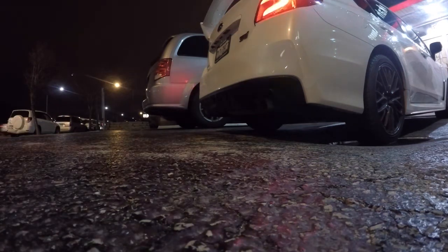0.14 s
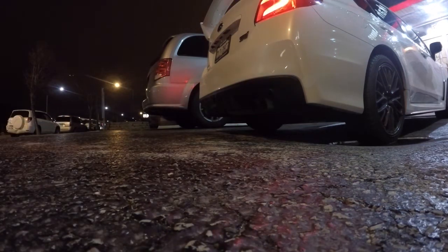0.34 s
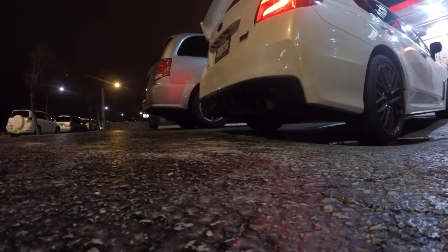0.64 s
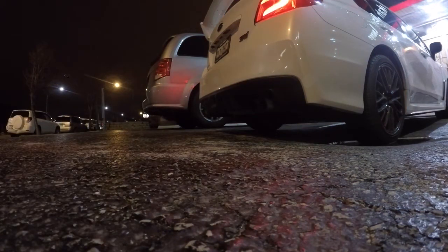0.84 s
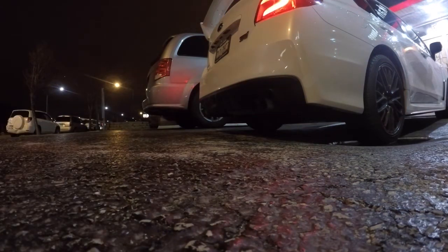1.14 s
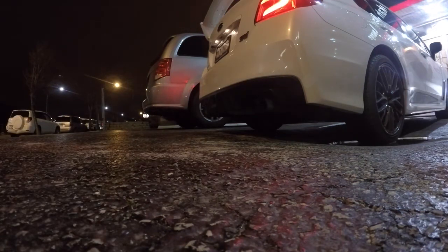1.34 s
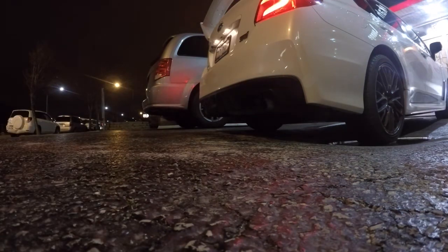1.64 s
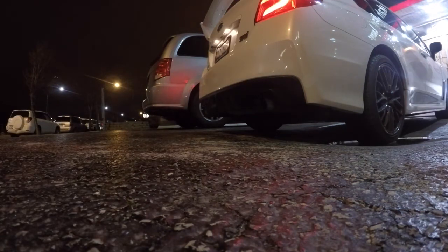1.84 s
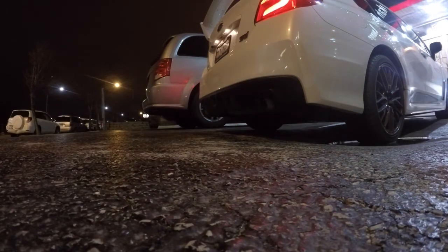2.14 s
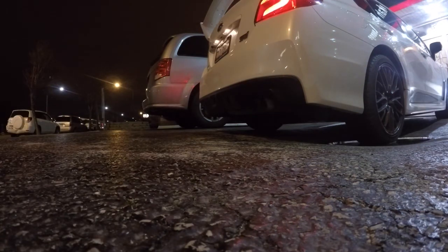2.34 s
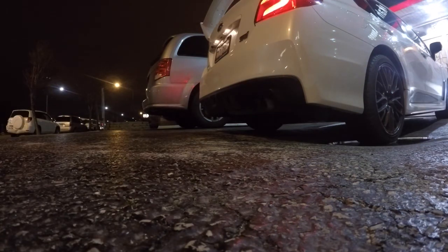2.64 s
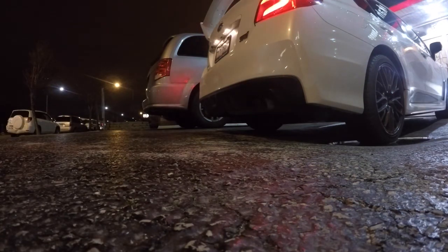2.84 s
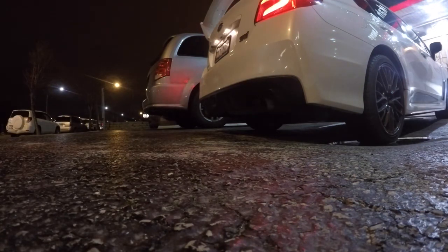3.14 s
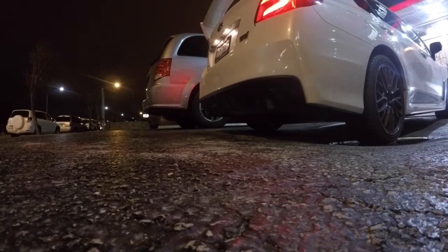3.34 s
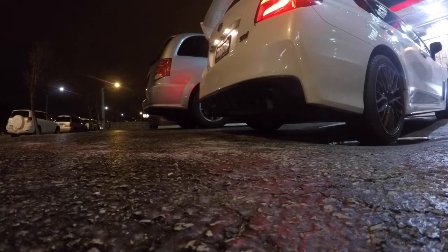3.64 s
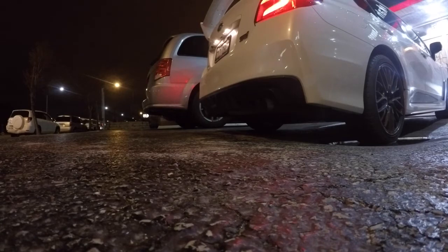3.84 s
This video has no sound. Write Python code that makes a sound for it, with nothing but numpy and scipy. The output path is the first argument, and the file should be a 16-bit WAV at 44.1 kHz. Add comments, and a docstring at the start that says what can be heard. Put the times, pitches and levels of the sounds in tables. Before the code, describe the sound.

A car engine starts in a night car park: quiet distant traffic first, then a starter clunk and grinding crank, clipped bangs as it catches, and a fast, low exhaust idle close to a microphone on the ground.

```python
"""Night car park: a cased action camera lies on the asphalt behind a car.
Shaped noise gives far traffic, broad hiss, rumble and a rustle; a thin electronic tick is a train of struck resonances.
The starter engages and cranks as noise ringing in its housing, with dull puffs from the pipe.
The four-cylinder engine catches with a few bangs and climbs to a fast cold idle: pulses excite exhaust modes.
The recorder turns its gain down, clips the first bangs and drops one block of samples."""
import sys
import numpy as np
from scipy import signal
from scipy.io import wavfile
from scipy.ndimage import uniform_filter1d

SR = 44100
rng = np.random.default_rng(int(sys.argv[2]) if len(sys.argv) > 2 else 0)


def store_pcm(level_fs):
    """Save levels as 16-bit WAV."""
    pcm = np.round(np.clip(level_fs, -1, 1) * 32767).astype(np.int16)
    wavfile.write(sys.argv[1], SR, np.atleast_2d(pcm).T)


def attenuation_scalar(level_db):
    """Turn a level in dB into a linear amplitude multiplier (20 dB per decade)."""
    decades = np.asarray(level_db, float) / 20
    return 10 ** decades


N = 176400
LONG = N + 2048   # spare samples to fill the dropped block
TIME = np.arange(LONG) / SR
SKIP_AT_S, SKIP_S = 3.4233, 0.0242   # start and length of the dropped block
RUNS_FROM_S = 3.085   # regular firing begins
CRACK_LAG_S = 0.0035   # the steepened front of a pulse peaks later than its start


def curve(rows, column=1):
    """Linear interpolation: a table column joined by straight lines in time."""
    return np.interp(TIME, np.array(rows)[:, 0], np.array(rows)[:, column])


def drift(rate_hz):
    """Low-passed random process: slow chance of unit spread, computed every 40 samples."""
    r = np.exp(-80 * np.pi * rate_hz / SR)
    white = rng.standard_normal(LONG // 40 + 2002)
    slow = signal.lfilter([1], [1, -2 * r, r * r], white)[2000:]
    return np.interp(np.arange(LONG) / 40, np.arange(len(slow)), slow / slow.std())


def noise(tone, patchy_db):
    """Band synthesis: bands of at most 0.4 octave, each with its level and flicker, sum to noise of rms 1."""
    hz, db = np.transpose(tone)
    edges = np.geomspace(hz[0], hz[-1], int(2.5 * np.log2(hz[-1] / hz[0])) + 2)
    out, white = 0, rng.standard_normal((2, LONG))
    for k, (low, high) in enumerate(zip(edges, edges[1:])):
        band_pass = signal.butter(2, [low, high], "band", fs=SR, output="sos")
        band = signal.sosfilt(band_pass, white[k % 2])
        band_db = np.interp(np.log(low * high) / 2, np.log(hz), db)
        out = out + band * attenuation_scalar(band_db + patchy_db * drift(9))
    return out / out.std()


def ring(x, hz, t60):
    """Damped resonance: a unit click starts a decaying sine of initial height 1."""
    r, w = attenuation_scalar(-60 / (t60 * SR)), 2 * np.pi * hz / SR
    return signal.lfilter([0, np.sin(w)], [1, -2 * r * np.cos(w), r * r], x + 1e-18)


def clicks(s, db):
    """Impulse excitation: single-sample clicks at the given times."""
    out = np.zeros(LONG)
    np.add.at(out, (np.asarray(s) * SR).astype(int), attenuation_scalar(np.asarray(db)))
    return out


def soften(x, hz):
    """Double one-pole low-pass: a click becomes a rounded push."""
    r = np.exp(-2 * np.pi * hz / SR)
    return signal.lfilter([(1 - r) ** 2], [1, -2 * r, r * r], x + 1e-18)


def high_pass(x, hz):
    """Second-order high-pass: removes the slow pressure below hz."""
    return signal.sosfilt(signal.butter(2, hz, "high", fs=SR, output="sos"), x)


# Far traffic swelling and fading: (time [s], level [dB])
TRAFFIC = [(0.0, -33.5), (0.15, -28.5), (0.3, -24.5), (0.45, -25), (0.7, -31.5), (1.0, -37.5), (1.12, -32),
           (1.22, -35), (1.32, -33), (1.37, -30), (1.64, -32), (1.9, -24), (2.29, -31), (2.6, -29.5)]
# Its spectrum: (frequency [Hz], level [dB per Hz])
TRAFFIC_TONE = [(59, -36.5), (100, -1), (129, -10), (313, -4.5), (412, 5), (509, -17), (623, -30.5),
                (689, -20.5), (900, -35), (1170, -65.5), (1980, -120)]


def traffic():
    """Distant sources merge: many vehicles add up to low, band-shaped noise."""
    return attenuation_scalar(curve(TRAFFIC)) * noise(TRAFFIC_TONE, patchy_db=0.5)


# Broad hiss, a receding car's tyres at first, later the whirr of the running engine: (time [s], level [dB])
BROAD_HISS = [(0, -38), (.1, -40.5), (.3, -41.5), (.48, -42), (.72, -44.5), (1.35, -46.5), (1.95, -48),
              (2.8, -46.5), (3.1, -52), (3.4, -49.5), (4.03, -46)]
# Its spectrum: (frequency [Hz], level [dB per Hz])
BROAD_HISS_TONE = [(350, -34.5), (600, -1), (715, -8), (961, -1.5), (1160, -5.5), (1360, -8), (2750, -17),
                   (3150, -23), (3600, -22), (6080, -39.5), (8640, -44.5), (14000, -54)]


def broad_hiss():
    """Broadband noise: a receding car's tyres at first, later the whirr of the running engine."""
    return attenuation_scalar(curve(BROAD_HISS)) * noise(BROAD_HISS_TONE, patchy_db=1.3)


# Low street rumble: (time [s], level [dB])
RUMBLE = [(0.0, -8.5), (0.03, -31.5), (0.27, -29.5), (1.36, -31.5), (1.4, -26.5), (1.47, -34.5),
          (1.84, -28), (2.1, -34.5)]
# Its spectrum: (frequency [Hz], level [dB per Hz])
RUMBLE_TONE = [(13, -32), (22, -11.5), (43, 4.5), (59, -0.5), (75, -8), (130, -5.5), (200, -11.5),
               (260, -36.5), (440, -120)]


def rumble():
    """Low-frequency noise: the street as a slowly varying rumble after a brief loud onset."""
    return attenuation_scalar(curve(RUMBLE)) * noise(RUMBLE_TONE, patchy_db=2.0)


# Spectrum of the rustle: (frequency [Hz], level [dB per Hz])
RUSTLE_TONE = [(1000, -4), (1800, 1), (3000, -10), (4500, 6), (8000, -17.5), (14000, -15)]


def rustle():
    """Amplitude modulation: flickering noise in a brief window, with one decaying tick."""
    start_s, end_s, level_db = 0.02, 0.315, -60.5
    window = soften((TIME > start_s) * (TIME < end_s) * 1., 30)
    grains = attenuation_scalar(level_db + 3.4 * drift(30)) * window
    tick = signal.lfilter([1], [1, -.985], clicks([0.272], [-45.5]))
    return (grains + tick) * noise(RUSTLE_TONE, patchy_db=0.8)


def electronic_tick():
    """Periodic excitation of a resonance: a thin tick repeats until soon after the engine catches."""
    count, per_s, first_s = 83, 29.97, 0.0305
    click_db = -59 + 1.5 * rng.standard_normal(count)
    train = clicks(first_s + np.arange(count) / per_s, click_db)
    return ring(soften(train, 9000), hz=8630, t60=0.015)


# Starter pinion crashing into the ring gear: (time [s], level [dB])
ENGAGE = [(1.975, -80), (1.985, -43.5), (2.0, -34.5), (2.03, -34.5), (2.045, -43), (2.06, -51),
          (2.09, -85.5)]
# Its spectrum: (frequency [Hz], level [dB per Hz])
ENGAGE_TONE = [(410, -39.5), (700, -9), (757, -15), (884, 4), (1020, -9.5), (1780, -2), (1920, -9),
               (3030, -9.5), (3490, -14), (15500, -39)]


def pinion_crash():
    """Impact noise: colliding teeth make a short, rough burst."""
    return attenuation_scalar(curve(ENGAGE) + 2.1 * drift(60)) * noise(ENGAGE_TONE, patchy_db=0.5)


# Starter effort, rising against each compression: (time [s], level [dB])
EFFORT = [(2.05, -47), (2.14, -47), (2.235, -44), (2.3, -50), (2.365, -47.5), (2.385, -41.5), (2.42, -41.5),
          (2.46, -46), (2.515, -50.5), (2.535, -40.5), (2.6, -43), (2.64, -39.5), (2.7, -37.5), (2.78, -39),
          (2.81, -45.5), (2.85, -52)]
# Gear noise spectrum: (frequency [Hz], level [dB per Hz])
GEAR_TONE = [(410, -40.5), (700, -4), (756, 0), (816, -3.5), (2690, -7), (3260, -14), (5590, -22.5),
             (6860, -32), (12600, -32), (14000, -48)]
# Housing resonances: (frequency [Hz], bandwidth [Hz], level [dB])
GEAR_RINGS = [(1430, 27, -6.5), (2216, 18, -3), (2725, 44, -1), (2930, 55, -1), (3800, 83, -7.5),
              (5830, 170, -20.5)]


def starter_gears():
    """Forced resonance: random tooth contact rings the housing, louder as the load rises."""
    white = rng.standard_normal(LONG)
    rings = 0
    for hz, width, db in GEAR_RINGS:
        # the root of the width sets how strongly each resonance is driven
        rings = rings + attenuation_scalar(db) * np.sqrt(width) * ring(white, hz, 1.8 / width)
    gears = noise(GEAR_TONE, patchy_db=0.54) + attenuation_scalar(-5.5) * rings / rings.std()
    running = soften((TIME > 1.99) * (TIME < EFFORT[-1][0]) * 1., 40)
    grit_db = 1.5 * drift(83)   # tooth-to-tooth flicker
    return running * attenuation_scalar(curve(EFFORT) + grit_db) * gears


# Unfired puffs from the tailpipe while cranking: (time [s], level [dB])
PUFFS = [(2.135, -16.5), (2.199, -13), (2.224, -13), (2.331, -18), (2.38, -16), (2.532, -17.5),
         (2.55, -19.5)]


def cranking_puffs():
    """Pulsating flow: unfired charges leave the pipe as dull pressure pushes."""
    puff_hz = 57
    push = soften(clicks(*np.transpose(PUFFS)), puff_hz) * SR / puff_hz / 1.93   # near unit height
    return high_pass(push, 22)


# Engine speed: (time [s], rate [engine cycles per second], four firings each)
SPEED = [(3.08, 15.3), (3.196, 16.2), (3.29, 16.3), (3.746, 16.1), (3.92, 16.0), (4.0, 15.8)]
# Cylinders in firing order: (header delay [s], level [dB], front level [dB])
CYLINDERS = [(0.001, -0.5, 3.5), (0.00013, 2.76, -5), (0.00057, -2, 0), (1.44e-3, 2.5, 1)]
# Engine load: (time [s], firing level [dB], unevenness [dB], front and hiss level [dB])
LOAD = [(3.0, 4.5, 2.5, -7.5), (3.08, 4.5, 4.5, -8), (3.15, 2, -2.5, -13), (3.22, 2.5, 1, -4.0),
        (3.3, 5.5, 0, -1), (3.45, 7.5, 2, 0.5), (3.7, 6.5, 1.45, -1.5), (4.03, 8.5, -0.2, 2)]


def regular_firings():
    """Phase integration: one firing each quarter cycle, as (time, level, sharpness, front level) rows."""
    first_cylinder_s, jitter_s, sharpness_hz = 3.47 + SKIP_S, 0.00017, 700
    turns = np.cumsum(curve(SPEED)) / SR * 4   # counts firings
    turns = turns - turns[int(first_cylinder_s * SR)]
    index = np.arange(np.ceil(turns[int(RUNS_FROM_S * SR)]), np.floor(turns[-200])).astype(int)
    chance = rng.standard_normal((len(index), 2))
    delay, cylinder_db, front_db = np.array(CYLINDERS)[index % 4].T
    s = np.interp(index, turns, TIME) + delay + jitter_s * chance[:, 0]
    at = (s * SR).astype(int)
    db = cylinder_db + curve(LOAD)[at] + curve(LOAD, column=2)[at] * chance[:, 1]
    return np.column_stack([s, db, np.full(len(s), sharpness_hz), front_db])


# Exhaust modes: (frequency [Hz], level [dB], t60 [s], sign)
EXHAUST = [(50.46, -18, .22, -1), (91, -13, 0.054, 1), (146.6, -17, 0.18, -1), (174, -16, .09, 1),
           (242.6, -17, 0.17, -1), (322.5, -14, 0.21, 1), (381.4, 0, 0.049, 1), (395.7, 0.5, 0.069, -1),
           (452.6, -12.5, 0.057, 1), (575.5, -30, 0.19, 1), (700, -30, .05, -1), (858, -36.5, 0.048, 1),
           (1091, -33, .04, -1), (1290, -40, .04, 1), (1620, -39.5, 0.033, -1)]
# Pitch of the modes, dipping slightly, then rising as the gas warms: (time [s], pitch factor, scatter [dB])
COLD_TUNING = [(2.6, 0.98, 1.82), (3.08, 0.97, 0.97), (3.3, 0.983, 0.9), (3.6, .99, 0.1),
               (4.0, 1.003, 0.94)]
# Car body and floor pan booming under the first firings: (frequency [Hz], level [dB], t60 [s])
BOOM = [(89.5, -15, 0.38), (154.9, -15, 0.39), (415, -11.5, 0.07), (482, -24, 0.022)]


def exhaust(firings):
    """Modal excitation: each pulse rings the pipe; high modes take its steep front, low ones its body."""
    front_from_hz, body_cut_hz = 650, 950
    boom_from_s, boom_fade_db_per_s = 2.75, 36
    out, span = np.zeros(LONG + SR), SR // 3
    tuning, scatter_db = curve(COLD_TUNING), curve(COLD_TUNING, column=2)
    load_db = curve(LOAD, column=3)
    chance = rng.standard_normal((len(firings), len(EXHAUST)))
    for (s, db, sharp_hz, front_db), draw in zip(firings, chance):
        at = int(s * SR)
        pulse = soften(clicks([0], [db])[:span], sharp_hz)
        front = np.roll(pulse, int(CRACK_LAG_S * SR)) * attenuation_scalar(front_db + load_db[at])
        body = soften(pulse, body_cut_hz)
        for (hz, mode_db, t60, sign), d in zip(EXHAUST, draw):
            push = front if hz > front_from_hz else body
            height = sign * attenuation_scalar(mode_db + d * scatter_db[at])
            out[at:at + span] += height * ring(push, hz * tuning[at], t60)
        if s < RUNS_FROM_S:
            fade = attenuation_scalar(-boom_fade_db_per_s * max(s - boom_from_s, 0))   # the boom weakens as it warms
            for k, (hz, boom_db, t60) in enumerate(BOOM):
                out[at:at + span] += fade * (-1) ** k * attenuation_scalar(boom_db) * ring(body, hz, t60)
    return high_pass(out[:LONG], 20)


# Sharp cracks on the hardest first firings: (time [s], level [dB], frequency [Hz], snap cutoff [Hz])
CRACKS = [(2.63, -19, 750, 1500), (2.674, -7, 640, 4000), (2.677, -6, 870, 4000), (2.739, -6, 753, 3000),
          (2.7855, -20, 894, 3000), (2.8083, -17.5, 807, 3000), (2.8306, -2, 800, 6000),
          (2.866, -21, 750, 1500), (2.909, -17, 894, 4010), (2.978, -20.5, 750, 1500),
          (3.011, -18.5, 795, 1800)]


def cracks():
    """Transient resonance: the hardest pulses ring for a few cycles, rounded by a low-pass."""
    out = 0
    for s, db, hz, snap_hz in CRACKS:
        out = out + soften(ring(clicks([s], [db]), hz, t60=4.4 / hz), snap_hz)
    return out


# Spectrum of the gas hiss: (frequency [Hz], level [dB per Hz])
RASP_TONE = [(500, -12), (700, -7), (900, -13.5), (1100, -1.5), (1400, -14.5), (1650, -13), (1900, -21),
             (3000, -20.5), (5000, -33.5)]


def rasp(fired):
    """Flow noise: turbulent gas hisses as each firing opens a decaying gate."""
    t60_s, rise_hz = 0.031, 600
    decay = signal.lfilter([1], [1, -attenuation_scalar(-60 / (t60_s * SR))], fired)
    gate = soften(decay, rise_hz)
    return attenuation_scalar(-48.5 + curve(LOAD, column=3)) * gate * noise(RASP_TONE, patchy_db=3.5)


# Uneven firings as the engine catches and runs up: (time [s], level [dB], sharpness [Hz])
CATCH = [(2.622, 17.5, 89.3), (2.67, 12, 750), (2.701, 9.5, 500), (2.734, 12.5, 750), (2.755, 6.5, 402),
         (2.78, 9.5, 700), (2.802, 8, 1000), (2.827, 13.5, 750), (2.844, 3, 492), (2.862, 11, 700),
         (2.882, 9, 495), (2.903, 11, 750), (2.921, 8, 604), (2.939, 8.5, 700), (2.956, 7, 492),
         (2.975, 11, 800), (2.992, 7, 600), (3.008, 9.5, 913), (3.025, 9, 601), (3.043, 4.5, 500),
         (3.06, 5.5, 510), (3.074, 8.5, 896)]


def engine():
    """Source and resonator: firing pulses drive the exhaust modes and gated hiss; cracks are added."""
    regular = regular_firings()
    s, db, _, front_db = regular.T
    firings = [tuple(row) for row in regular] + [(*row, 0) for row in CATCH]
    fired = clicks(s + CRACK_LAG_S, db + front_db) + clicks(*np.transpose(CATCH)[:2])
    return exhaust(firings) - cracks() + rasp(fired)


def drop_block(air):
    """Waveform discontinuity: a block is lost and the jump at the join settles exponentially."""
    join_step, settle_s = 1.0, 0.0012
    cut = int(SKIP_AT_S * SR)
    after = air[cut + int(SKIP_S * SR):]
    settling = np.exp(-TIME[:len(after)] / settle_s)
    after = after + (air[cut] + join_step - after[0]) * settling
    return np.r_[air[:cut], after]


def scene():
    """Superposition: all sources add, one block is lost and the last 4 ms fade out."""
    surroundings = traffic() + broad_hiss() + rumble() + rustle()
    starter = pinion_crash() + starter_gears() + cranking_puffs()
    air = surroundings + electronic_tick() + starter + engine()
    fade = np.minimum((N - np.arange(N)) / (0.004 * SR), 1)
    return drop_block(air)[None, :N] * fade


def gain_control(x):
    """Dynamic compression: gain falls with the level over a threshold and recovers slowly."""
    from_db, share, attack_s, release_db_per_s = -15.5, 0.57, 0.047, 22
    level_db = 10 * np.log10(uniform_filter1d(x[0] ** 2, size=1323) + 1e-12)   # 30 ms power
    fall = release_db_per_s * TIME[:N]
    held_db = np.maximum.accumulate(level_db + fall) - fall   # peaks held, sinking at the release rate
    over_db = np.maximum(held_db - from_db, 0)
    r = np.exp(-1 / (attack_s * SR))
    return x * attenuation_scalar(-share * signal.lfilter([1 - r], [1, -r], over_db))


# Spectrum of the recorder's own hiss: (frequency [Hz], level [dB per Hz])
SELF_NOISE_TONE = [(4000, -5.5), (6000, -2.5), (10000, -7.5), (12500, -20)]


def self_noise():
    """Electronic noise: a faint hiss that the gain control does not touch."""
    return attenuation_scalar(-80.5) * noise(SELF_NOISE_TONE, patchy_db=1.5)[:N]


def clip(x):
    """Saturation: a steep soft curve bounds peaks at full scale."""
    return x / (1 + x ** 6) ** (1 / 6)


def band_limit(x):
    """A steep low-pass at the top of the band."""
    return signal.sosfilt(signal.butter(12, 16330, fs=SR, output="sos"), x)


def record(dry):
    """Recording chain: gain control, added hiss, then clipping."""
    mix = clip(gain_control(dry) + self_noise())
    return band_limit(mix)


dry = scene()
out = record(dry)
store_pcm(out)
```